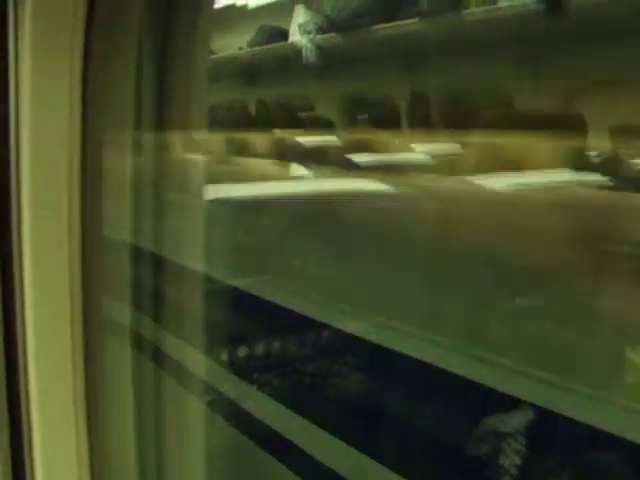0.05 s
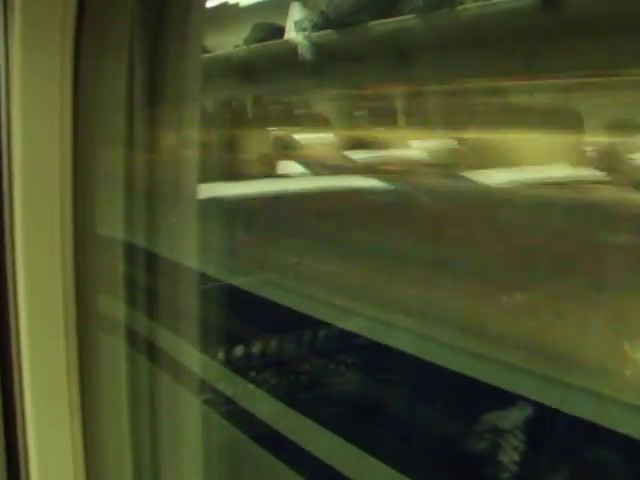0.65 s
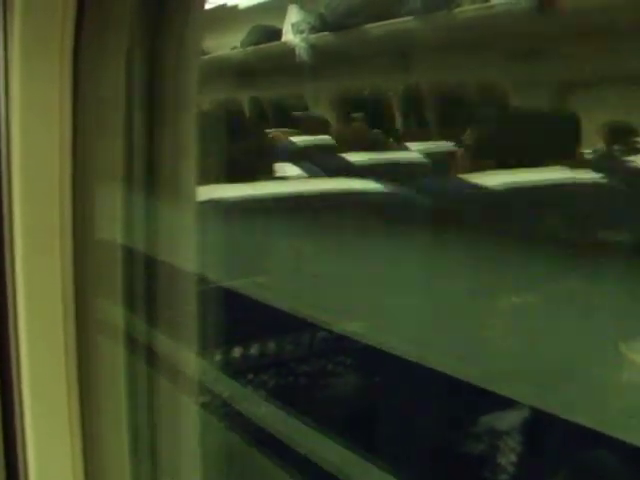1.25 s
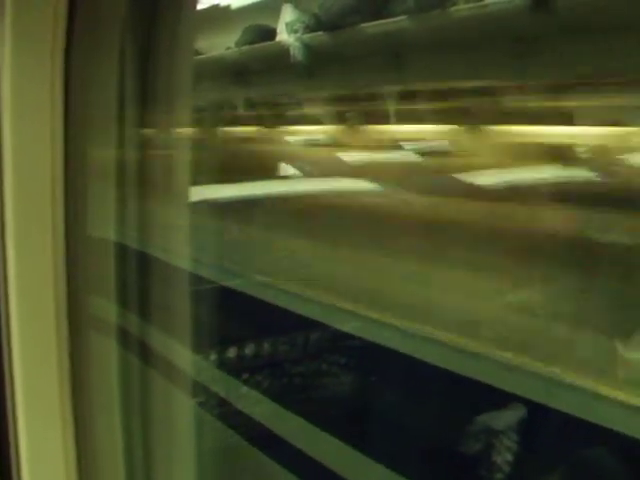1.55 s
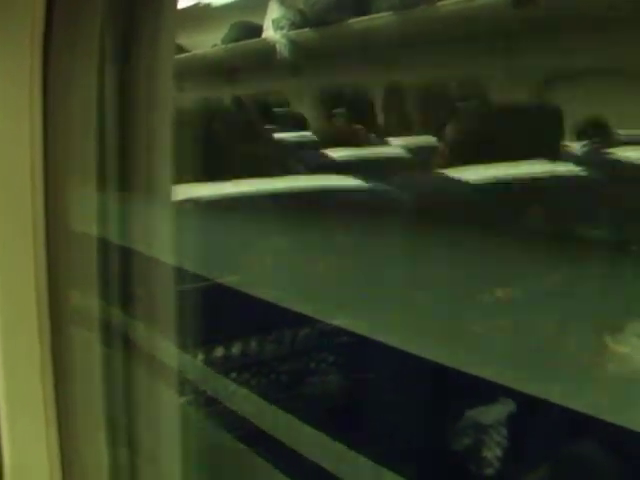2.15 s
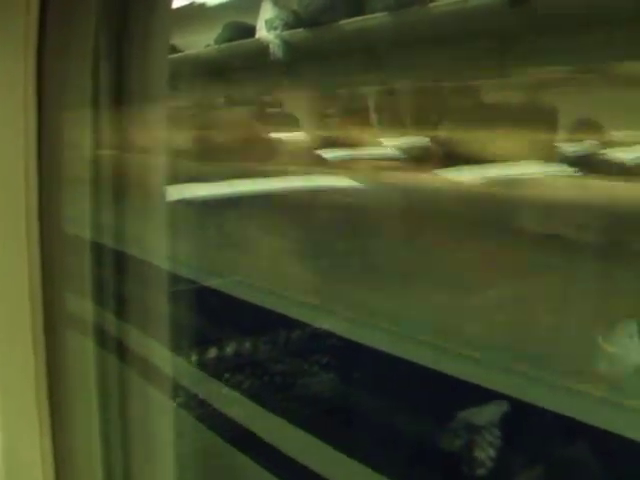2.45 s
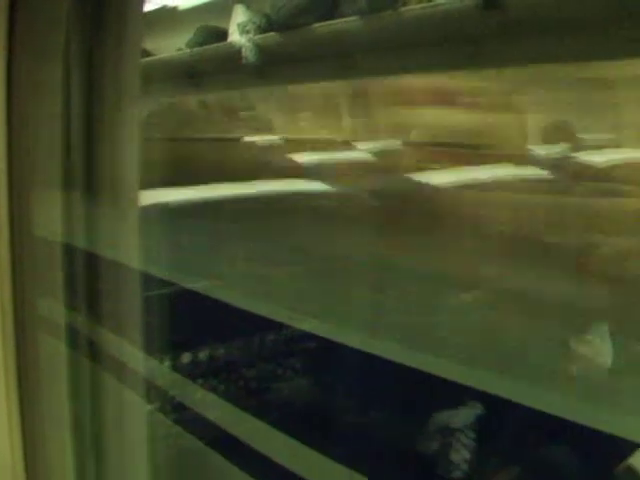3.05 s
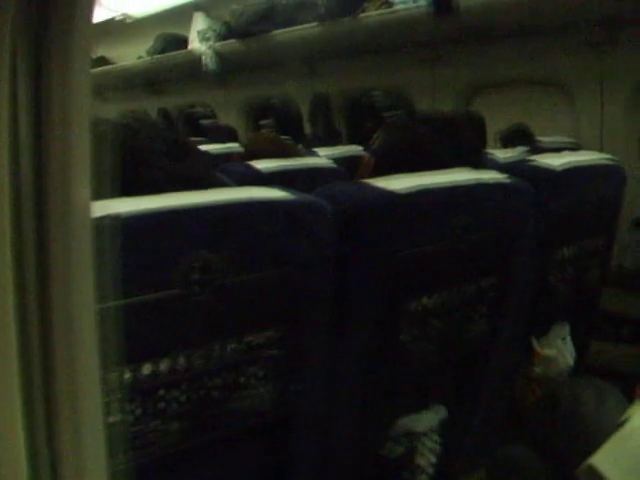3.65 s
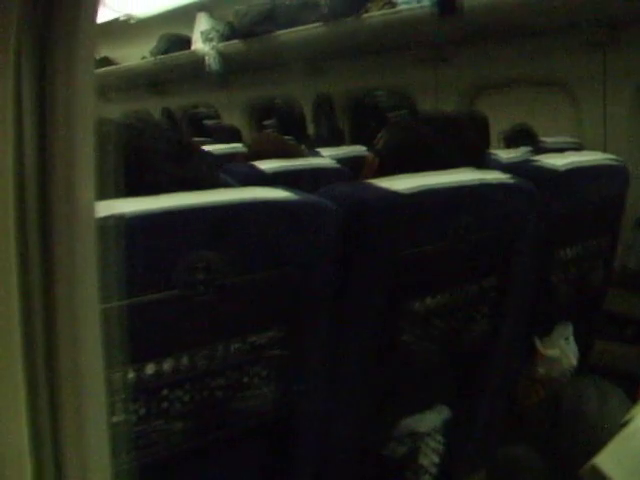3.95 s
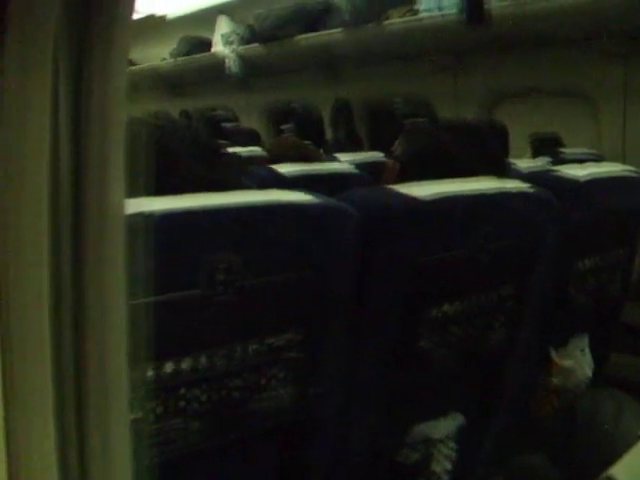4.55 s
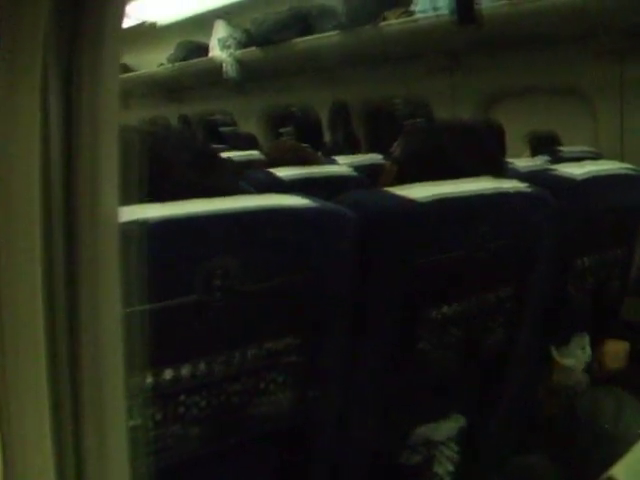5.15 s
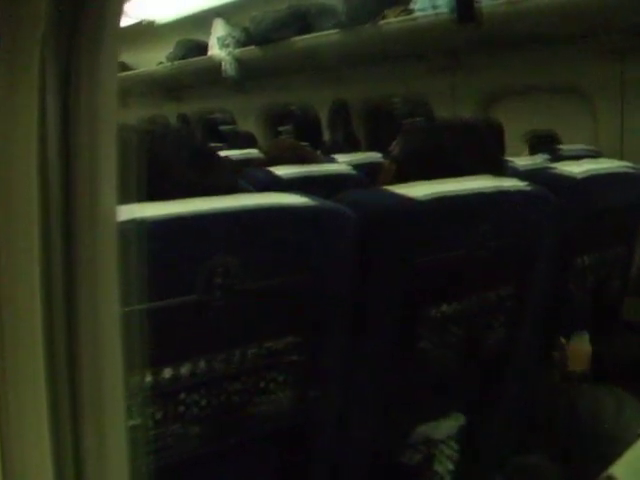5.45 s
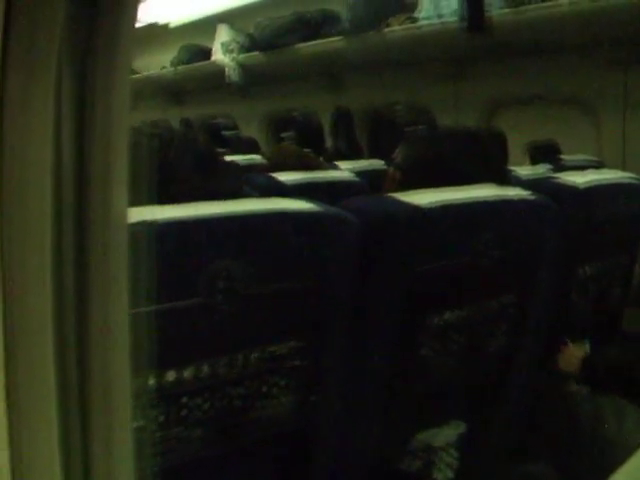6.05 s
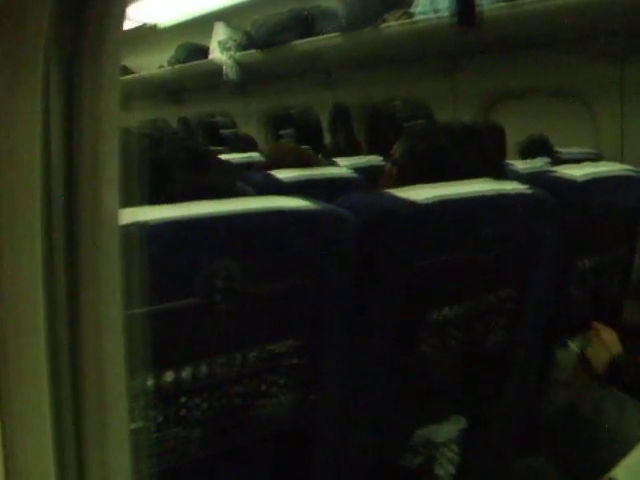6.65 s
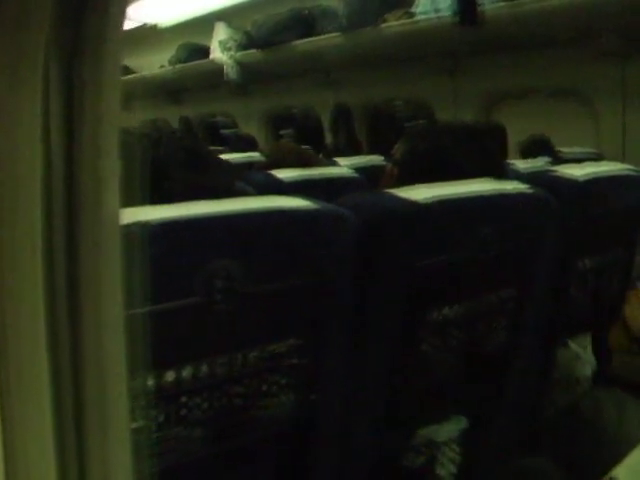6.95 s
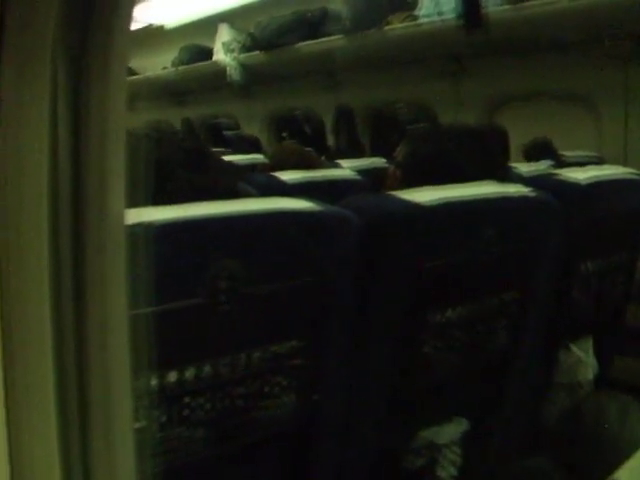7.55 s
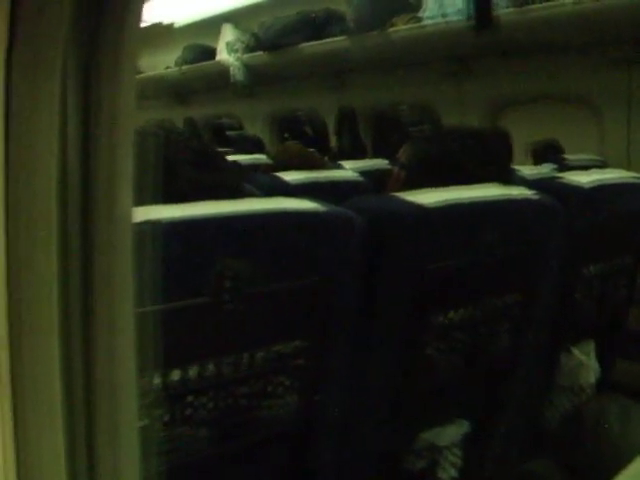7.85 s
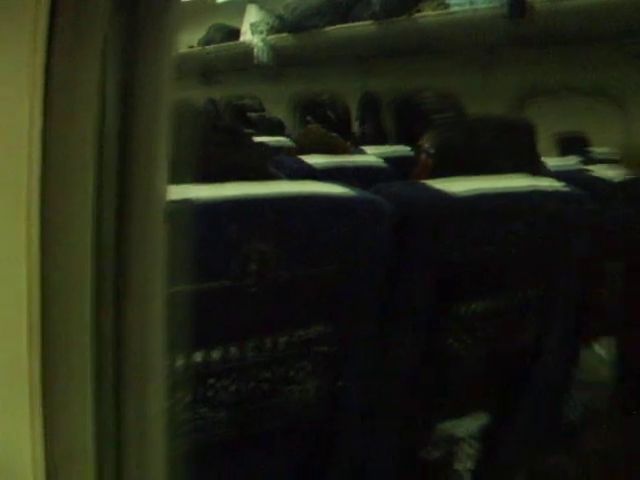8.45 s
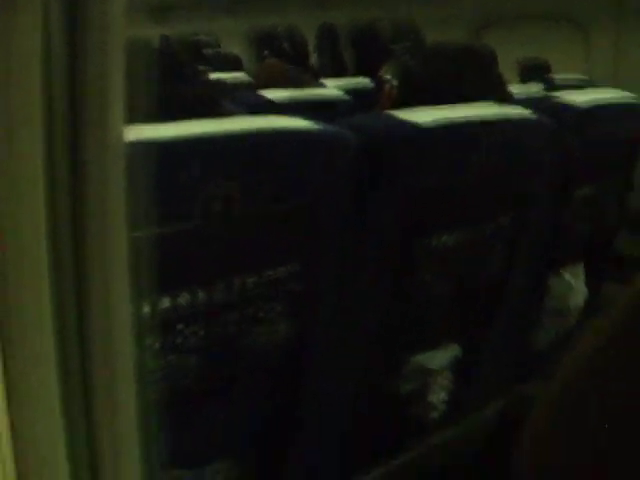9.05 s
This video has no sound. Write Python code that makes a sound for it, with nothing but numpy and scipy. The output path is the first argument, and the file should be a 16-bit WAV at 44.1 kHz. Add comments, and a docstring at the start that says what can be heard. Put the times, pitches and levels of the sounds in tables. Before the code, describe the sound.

Inside a high-speed train, a steady low rumble and wheel roar carry on under occasional dull bumps and light clicks nearby.

```python
"""Inside a high-speed train

The car body rumbles, the floor booms, the wheels roar on the rails and the drive whines.
Bumps in the track thump the body, and a limiter turns everything down for a moment on the big ones.
Nearby, small things click and a passenger's clothes rustle. Behind it all, air rushes along the hull,
the vents hiss and the power electronics sing faintly."""
import sys
import numpy as np
from scipy import signal
from scipy.fft import rfft, irfft, next_fast_len
from scipy.io import wavfile
from scipy.ndimage import uniform_filter1d, map_coordinates

SR = 44100
rng = np.random.default_rng(int(sys.argv[2]) if len(sys.argv) > 2 else 0)


def dump_mix(stems):
    """Bounce the given channels to the path in sys.argv[1] as a 16-bit WAV at rate SR."""
    frames = np.atleast_2d(stems).T  # one column per channel
    limited = np.clip(frames, -1, 1)  # hard clip at full scale
    pcm = np.round(limited * 32767).astype(np.int16)
    wavfile.write(sys.argv[1], SR, pcm)


N = 409688


# how hard the track shakes the car (time [s], level [dB])
BODY_LEVEL = [(0, -20.5), (0.75, -21.5), (1.35, -28.5), (1.85, -23.5), (3.9, -24), (4.6, -18.5),
              (5.5, -22.5), (6.3, -22.5), (7.2, -21), (8.5, -22), (9.29, -18)]
# the tone of the body's rumble (frequency [Hz], relative level [dB])
BODY_SPECTRUM = [(8, -18), (20, -12.5), (30, -4), (41, 0), (49, 3), (60, 0.5), (75, -4.5), (100, -25),
                 (200, -70)]
# how loudly the floor booms (time [s], level [dB])
FLOOR_LEVEL = [(0, -21.5), (1.3, -24), (3.4, -24), (4.6, -21.5), (6.7, -21), (8.1, -22.5), (9.29, -22.5)]
# the tone of that boom (frequency [Hz], relative level [dB])
FLOOR_SPECTRUM = [(45, -24), (70, -5.5), (85, 0.5), (105, -0.5), (130, -3.5), (175, -5.5), (215, -8),
                  (250, -12.5), (300, -27.5), (500, -67)]

def car_rumble():
    """Rolling shakes the heavy car body into a deep rumble and the floor into a higher boom."""
    body_db, = curves(BODY_LEVEL)
    floor_db, = curves(FLOOR_LEVEL)
    sway = coloured_noise(BODY_SPECTRUM, patchy_db=1.8)
    strength = np.abs(signal.hilbert(sway))
    sway = unit(sway / (strength + 0.6) ** 0.35)  # a heavy body sways steadily, so even it out
    boom = coloured_noise(FLOOR_SPECTRUM, patchy_db=0.3)
    return amp(body_db) * sway + amp(floor_db) * boom


# how noisy the rail is under the wheels (time [s], level [dB])
RAIL_LEVEL = [(0, -44), (0.6, -40.5), (1.7, -39.6), (2.35, -41), (3.2, -40.5), (4.4, -42.5), (4.9, -45.5),
              (6.2, -44), (7.9, -46), (9.29, -43)]
# short rough stretches of rail (middle [s], length [s], swell [dB])
ROUGH_RAIL = [(4.7, 0.34, 1.5), (5.5, 0.41, 3), (6.54, 0.36, 2.5)]
# the wheels' low roar through the floor (frequency [Hz], relative level [dB])
ROAR_SPECTRUM = [(170, -27), (250, -6), (285, -3), (325, 1.5), (360, -5), (440, -7.5), (475, -8),
                 (510, -10.5), (595, -12), (700, -17.5), (825, -14.5), (930, -19), (1100, -31), (2000, -72)]
# the higher noise of the rail (frequency [Hz], relative level [dB])
RAIL_SPECTRUM = [(700, -31), (1000, -2.5), (1150, -0.5), (1270, 0.5), (1350, 0.5), (1500, 2.5),
                 (1660, -2.5), (1750, -2), (1850, -8), (2350, -7), (2650, -11.5), (3300, -22.5),
                 (7000, -45)]
# the bright sizzle on top (frequency [Hz], relative level [dB])
SIZZLE_SPECTRUM = [(1200, -21), (1750, 3), (2000, -2.5), (2450, -5.5), (2700, -11.5), (3600, -11),
                   (4200, -12.5), (4550, -9.5), (5300, -21), (8000, -40)]

def wheels():
    """Wheels on the rail roar and sizzle, and swell where the rail is rough."""
    rail_db, = curves(RAIL_LEVEL)
    dip_db = rail_db - rail_db.max()  # zero on the noisiest rail
    roughness_db = swells(ROUGH_RAIL) + 0.23 * wobble(9.8)
    roar = amp(-28 + 0.49 * dip_db) * coloured_noise(ROAR_SPECTRUM, patchy_db=1.04)
    rail = amp(rail_db) * coloured_noise(RAIL_SPECTRUM, patchy_db=0.4)
    # the sizzle changes most, so louder rail also sounds brighter
    sizzle = amp(-46.5 + 1.34 * dip_db) * coloured_noise(SIZZLE_SPECTRUM, patchy_db=2.0)
    return amp(roughness_db) * (roar + rail + sizzle)


# bumps in the track (time [s], level [dB], pitch [Hz], time to fade by 60 dB [s])
JOLTS = [(2.219, -0.5, 53.3, 0.16), (4.867, -4, 56, 0.2), (5.016, 7.5, 50.7, 0.17), (5.611, -2, 51, 0.19),
         (6.218, 0.5, 54.5, 0.073), (6.873, -2.5, 53.2, 0.22), (7.428, -3.5, 55.2, 0.22),
         (7.865, -6, 52.3, 0.31)]

def jolts():
    """Each bump sets the car body swinging for a few cycles: a low thump."""
    out, t = np.zeros(N), np.arange(SR // 2) / SR
    onset = 1 - np.exp(-t / 0.0055)
    for start, db, hz, fade_s in JOLTS:
        add(out, start, amp(db - 60 * t / fade_s) * onset * np.sin(2 * np.pi * hz * t))
    return out


# the whine of the gears (time [s], pitch [Hz], level [dB])
GEAR_WHINE = [(0, 1500, -49), (1.6, 1508, -47), (2.4, 1507, -49), (3.2, 1535, -47), (4.2, 1532, -49.5),
              (4.8, 1528, -53.5), (5.5, 1512, -61.5), (6.3, 1570, -52), (7.0, 1590, -67.5),
              (9.29, 1587, -59)]
# moments when the whine flares up (middle [s], length [s], swell [dB])
WHINE_FLARES = [(1.75, 0.3, 7), (5.42, 0.41, 11), (6.52, 0.38, 5.5)]
# the broad ringing of the rail (frequency [Hz], relative level [dB])
RAIL_RING_SPECTRUM = [(600, -25.5), (750, 3), (830, 9), (920, -11), (1100, -21.5), (1380, -4.5), (1510, -3),
                      (1620, -5.5), (1850, -27.5)]

def drive():
    """The gears make a fuzzy whine, and the rail rings along with it."""
    pitch_hz, db = curves(GEAR_WHINE)
    phase = 2 * np.pi * np.cumsum(pitch_hz) / SR
    whine = unit(wobble(48) * np.sin(phase) + wobble(48) * np.cos(phase))  # wobbles blur the pure tone
    ringing = amp(0.5) * unit(amp(1.4 * wobble(25)) * coloured_noise(RAIL_RING_SPECTRUM, patchy_db=3.0))
    return amp(db + swells(WHINE_FLARES)) * (whine + ringing)


# clicks and scuffs (time [s], relative level [dB], rise [s], time to fade by 60 dB [s],
# brightness [dB per octave], pitch [ratio])
CLICKS = [(1.554, -42.5, .001, .05, 23, 1.1), (1.79, -39, .001, .04, -8, 2.2),
          (2.257, -40, .0005, 0.032, 5, 0.99), (2.779, -38, .0005, 0.022, -2, 2),
          (3.262, -41.5, .0005, 0.018, 6, 1), (4.21, -22.5, 0.0013, 0.031, 0.5, 1.03),
          (4.217, -27, 0.0012, 0.07, -7.5, 1.03), (4.234, -26.5, 0.00075, 0.041, -6, 1),
          (4.252, -34.5, .001, 0.035, -2, 1.1), (6.285, -30.5, 0.0022, 0.04, -1.5, 1.5),
          (6.292, -31, 0.0018, 0.04, 5.5, 1.4), (6.295, -38.5, 0.0023, 0.089, 4, 1.1),
          (6.688, -43.5, .004, 0.1, 4, 0.98), (8.361, -33.5, .0005, 0.024, -6, 0.89),
          (8.901, -29, .0003, 0.022, -8, 1), (8.932, -31, .0005, 0.026, -6, 1),
          (8.940, -32, .0004, .02, -5, 1.2), (8.966, -32, 0.0018, 0.036, -1, 1),
          (8.972, -21, 0.00065, 0.0097, -0.5, 0.97), (9.043, -23.5, .0005, 0.019, -7, 1.05),
          (9.256, -35, .001, 0.034, -7.5, 1.9)]
# the notes that small plastic things ring at (frequency [Hz], width [Hz], relative level [dB])
PLASTIC_RINGS = [(1190, 170, -2.5), (1930, 240, 1), (2280, 350, 0.5), (3270, 420, -4.5), (4200, 500, -7),
                 (5040, 790, -7), (6840, 1100, -8), (7700, 440, -10.5)]

def clicks():
    """Small hard things touch with a crack and a ringing scrape; the cabin echoes briefly."""
    out, t = np.zeros(N), np.arange(SR // 4) / SR
    for start, db, rise_s, fade_s, brightness, pitch in CLICKS:
        strengths = amp(rng.normal(0, 0.51, len(PLASTIC_RINGS)))  # each touch rings a little differently

        def colour(hz):
            f = hz / pitch
            ring = 0
            for k, (centre, width, ring_db) in enumerate(PLASTIC_RINGS):
                resonance = 1j * f * width / (centre ** 2 - f ** 2 + 1j * f * width)
                ring += (-1) ** k * strengths[k] * amp(ring_db) * resonance
            octaves = np.log2(np.clip(hz, 1000, TOP_HZ) / 1000)
            return ring * amp(brightness * octaves) * (hz < TOP_HZ)

        scrape = unit(filtered(rng.standard_normal(len(t)), colour))
        fade = amp(-60 * t / fade_s)
        echo = amp(-30.5 - 60 * t / 0.25)
        crack = amp(-1.5 - 60 * t / 0.0045) * rng.standard_normal(len(t))
        onset = 1 - np.exp(-t / rise_s)
        add(out, start, amp(db + 3) * (scrape * (fade + echo) + crack) * onset)
    return out


# rubs of clothes and a bag (start [s], length [s], level [dB])
RUSTLES = [(2.05, 0.17, -54), (2.71, 0.06, -47.5), (3.286, 0.33, -50.5), (3.65, 0.2, -58.5),
           (4.118, 0.32, -52.5), (6.083, 0.28, -54.5), (8.08, 0.17, -54.5), (8.64, 0.073, -53.5)]
# the tone of rubbing cloth (frequency [Hz], relative level [dB])
CLOTH_SPECTRUM = [(1500, -21), (3000, -2), (5000, -3), (7300, -1.5), (9000, -7.5)]
# the tone of a sliding sleeve (frequency [Hz], relative level [dB])
SLEEVE_SPECTRUM = [(900, -27), (1900, 2), (2400, 8), (3200, 8), (4000, -11), (6000, -22.5), (9000, -32)]

def passenger():
    """Cloth catches and slips unevenly as it rubs; once, a sleeve slides close by."""
    rubbing = amp(-66.5)  # faint stirring between the rubs
    for start, length, db in RUSTLES:
        rubbing += amp(db) * stroke(start, length, rise_s=0.091, fall_s=0.04)
    sliding = amp(-45) * stroke(start_s=8.54, length_s=0.5, rise_s=0.36, fall_s=0.42)
    cloth = unit(amp(2.5 * wobble(120)) * coloured_noise(CLOTH_SPECTRUM, patchy_db=1.0))
    sleeve = unit(amp(2.5 * wobble(70)) * coloured_noise(SLEEVE_SPECTRUM, patchy_db=1.5))
    return rubbing * cloth + sliding * sleeve


# how loudly air rushes along the hull (time [s], level [dB])
HULL_AIR_LEVEL = [(0, -50.3), (1.6, -49.5), (3.4, -48), (5.0, -51), (6.4, -49.5), (7.6, -51.5), (9.29, -51)]
# the tone of that rush (frequency [Hz], relative level [dB])
HULL_AIR_SPECTRUM = [(1800, -33.5), (2600, -8), (2850, 0.5), (3000, -1), (3200, 2), (3500, -4.5),
                     (3950, -6), (4550, -7), (5000, -11.5), (6000, -20), (9000, -45.5)]
# the hiss of the vents (frequency [Hz], relative level [dB])
VENT_SPECTRUM = [(2500, -25), (4500, -9.5), (5300, 2.5), (6500, 3), (7600, -1), (9000, -9)]

def air():
    """Air rushes along the hull, a little louder on rough rail, and hisses from the vents."""
    db, = curves(HULL_AIR_LEVEL)
    hull = amp(db + 0.4 * swells(ROUGH_RAIL)) * coloured_noise(HULL_AIR_SPECTRUM, patchy_db=0.85)
    vents = amp(-58) * coloured_noise(VENT_SPECTRUM, patchy_db=2.5)
    return hull + vents


# tones of the electronics (pitch [Hz], relative level at the start [dB], at the end [dB])
ELECTRONIC_TONES = [(2640, -73, -68), (2821, -62, -78), (2881, -64, -61), (3001, -65, -65),
                    (3121, -63, -61), (3360, -67, -58), (5642, -69, -75), (6002, -76, -81),
                    (6362, -73, -75), (6482, -72, -80), (7853, -75, -76), (7882, -73, -76),
                    (8118, -75, -77), (8149, -75, -78)]

def electronics():
    """The power electronics sing thin, high tones that waver and drift in loudness."""
    out, t = np.zeros(N), np.arange(N) / SR
    for hz, first_db, last_db in ELECTRONIC_TONES:
        db = np.linspace(first_db, last_db, N) + 2.2 * wobble(1.6)
        out += amp(db) * unit(np.sin(2 * np.pi * hz * t + 0.44 * wobble(5.5)))
    return amp(-0.5) * out


def amp(db):
    """Turn decibels into a number to multiply by."""
    return 10 ** (np.asarray(db) / 20)


def unit(x):
    """Scale a signal to an average strength (rms) of 1."""
    return x / np.sqrt(np.mean(x ** 2) + 1e-20)


def along(points, hz):
    """Read between (frequency, value) points, giving each octave equal room."""
    frequencies, values = np.transpose(points)
    return np.interp(np.log(hz + 1), np.log(frequencies + 1), values)


def curves(rows):
    """Join a table's rows with straight lines: one curve for each column after the time."""
    times, *columns = np.transpose(rows)
    return [np.interp(np.arange(N) / SR, times, column) for column in columns]


def wobble(rate):
    """A smooth curve through `rate` random values a second."""
    return map_coordinates(rng.standard_normal(int(N * rate / SR) + 4), [np.arange(N) * rate / SR])


def swells(rows):
    """Smooth humps in dB, one for each (middle, length, height) row."""
    t = np.arange(N) / SR
    return sum(db * np.cos(np.pi * np.clip((t - s) / length, -.5, .5)) ** 2 for s, length, db in rows)


def stroke(start_s, length_s, rise_s, fall_s):
    """A loudness shape that rises, then dies away once its length is over."""
    t = np.arange(N) / SR - start_s
    return np.clip(t / rise_s, 0, 1) * np.exp(-np.maximum(t - length_s, 0) / fall_s)


def filtered(x, response):
    """Turn each frequency in x up or down by response(frequency)."""
    size = next_fast_len(len(x) + 8192)
    return irfft(rfft(x, size) * response(np.fft.rfftfreq(size, 1 / SR)), size)[:len(x)]


def coloured_noise(spectrum, patchy_db):
    """Noise of strength 1 with the given tone, and random louder and softer patches."""
    grid = signal.stft(rng.standard_normal(N), nperseg=512)[2]
    patches = uniform_filter1d(rng.standard_normal(grid.shape), size=6, axis=0)  # smooth over frequency
    patches = uniform_filter1d(patches, size=16, axis=1)  # and over time
    noise = signal.istft(grid * amp(patchy_db * unit(patches)), nperseg=512)[1][:N]
    return unit(filtered(noise, lambda hz: amp(along(spectrum, hz))))


def add(track, start_s, sound):
    """Mix a sound into the track at the given time."""
    part = track[round(start_s * SR):][:len(sound)]
    part += sound[:len(part)]


def scene():
    """Everything heard at the window seat, in one channel."""
    train = car_rumble() + wheels() + jolts() + drive()
    return (train + clicks() + passenger() + air() + electronics())[None]


def limiter(x, ceiling_db, release_s):
    """Turn the volume down at once on a loud peak, then let it creep back."""
    excess = np.maximum(np.abs(x) / amp(ceiling_db), 1)
    needed_cut = np.log(excess) + 1e-9
    clock = np.arange(N) / SR / release_s
    # each cut fades away until a bigger one takes over
    cut = np.exp(np.maximum.accumulate(np.log(needed_cut) + clock) - clock)
    return x * uniform_filter1d(np.exp(-cut), size=64)


# how the microphone dulls the highest sounds (frequency [Hz], gain [dB])
TREBLE_ROLLOFF = [(7800, 0), (8200, -6.5), (8500, -13), (8800, -21.5), (9000, -37)]
TOP_HZ = 9000  # nothing higher gets through

def record(dry):
    """Hold down the peaks, add a steady hiss and cut off the highest treble."""
    held = limiter(dry[0], ceiling_db=-9.5, release_s=0.046)
    hiss = amp(-55.5) * rng.standard_normal(N)
    return filtered(held + hiss, lambda hz: amp(along(TREBLE_ROLLOFF, hz)) * (hz < TOP_HZ))[None]


dry = scene()
out = record(dry)
dump_mix(out)
```